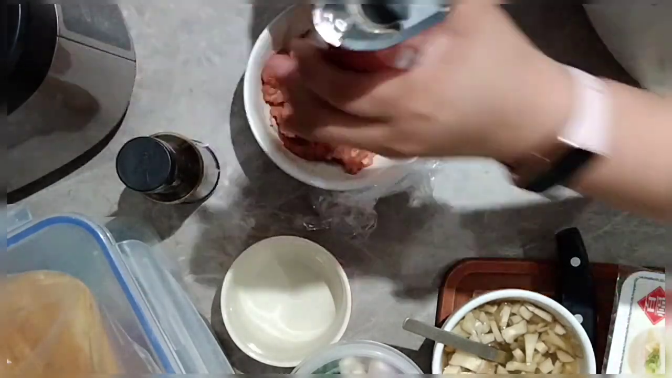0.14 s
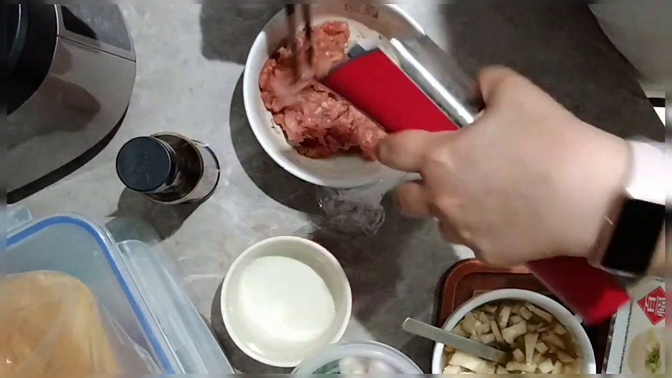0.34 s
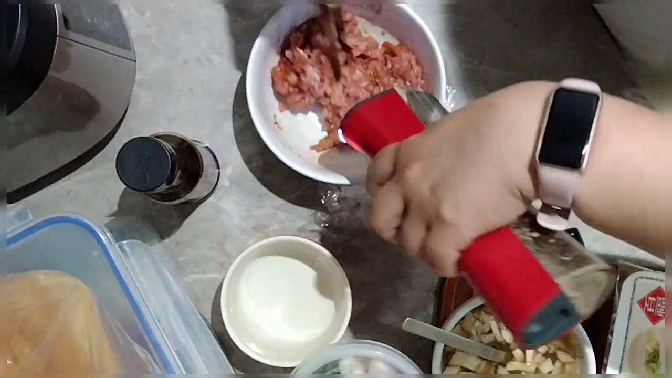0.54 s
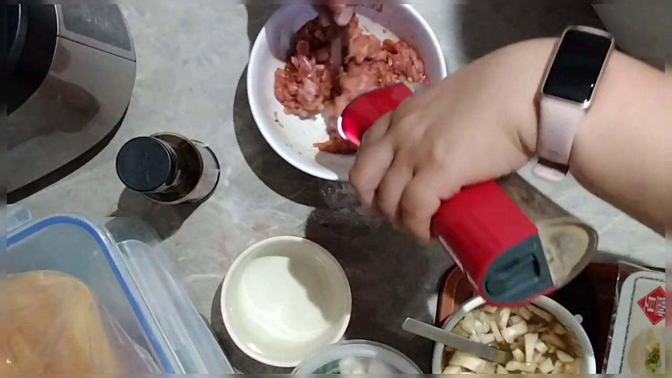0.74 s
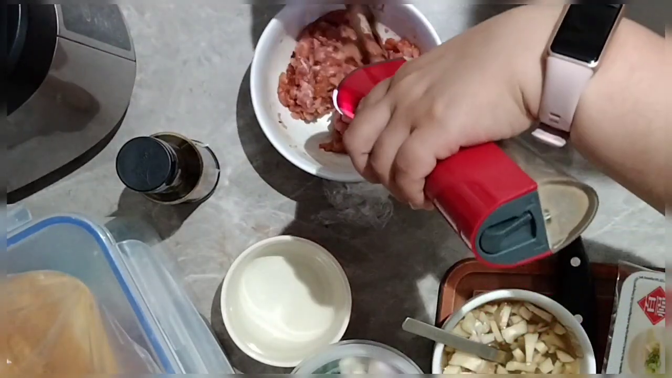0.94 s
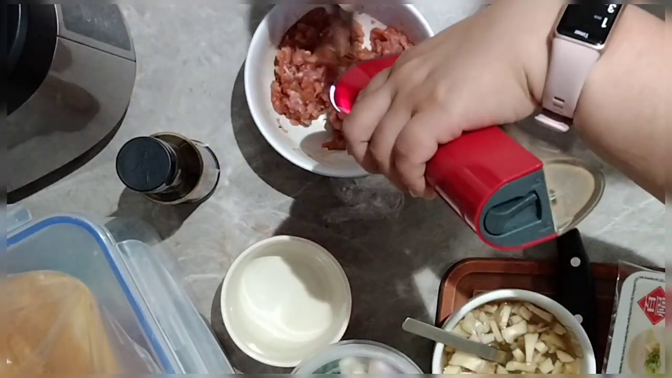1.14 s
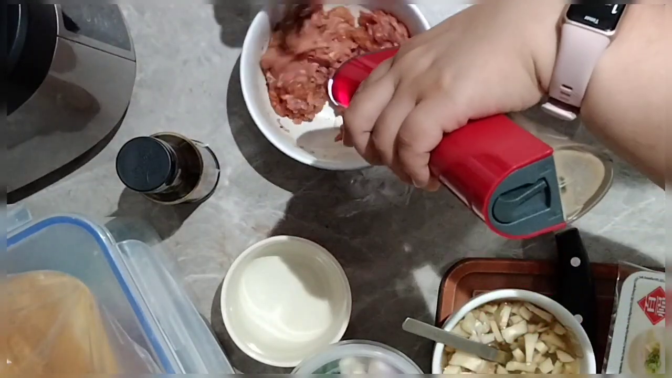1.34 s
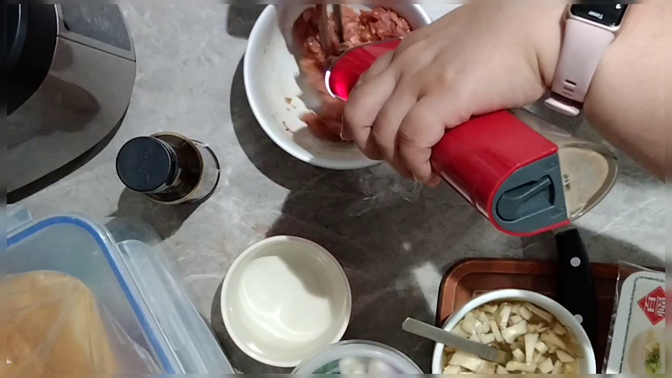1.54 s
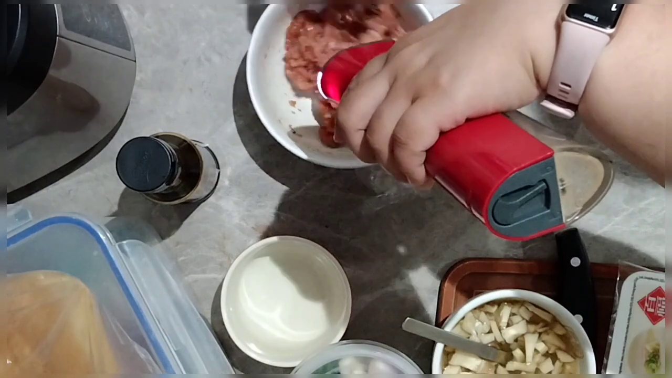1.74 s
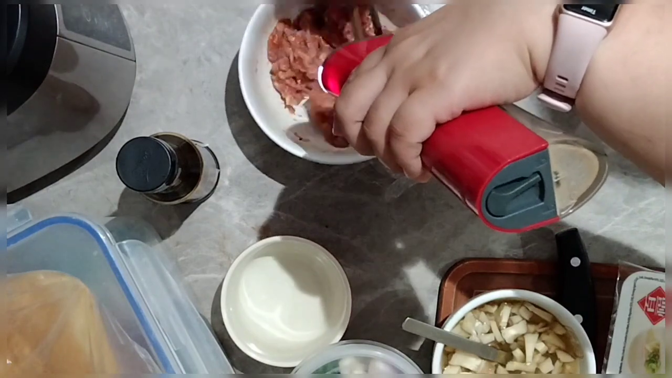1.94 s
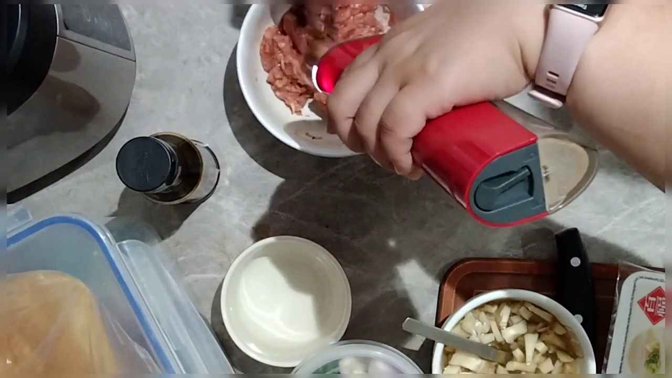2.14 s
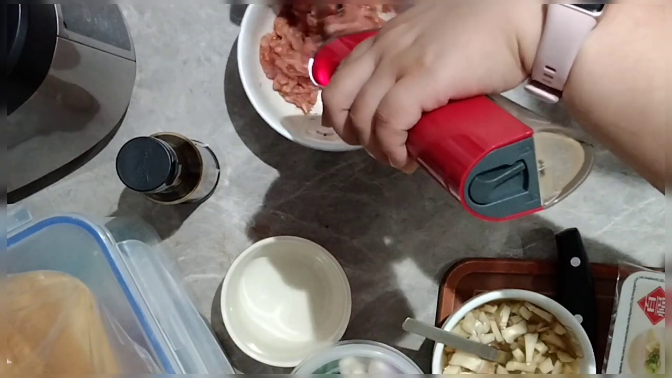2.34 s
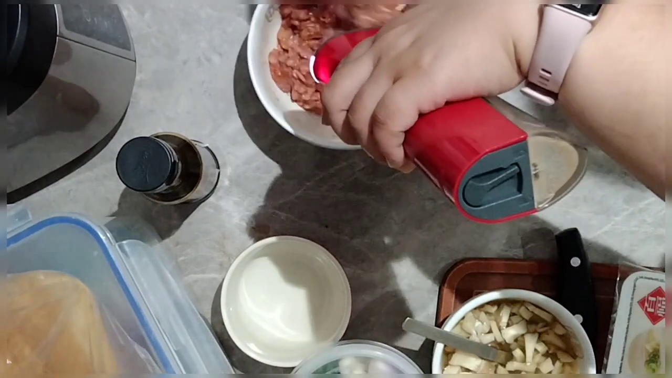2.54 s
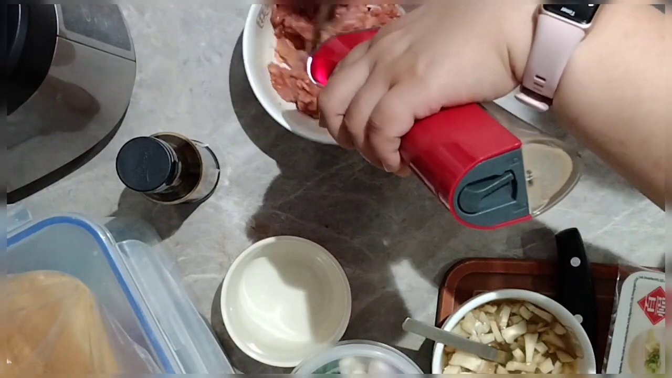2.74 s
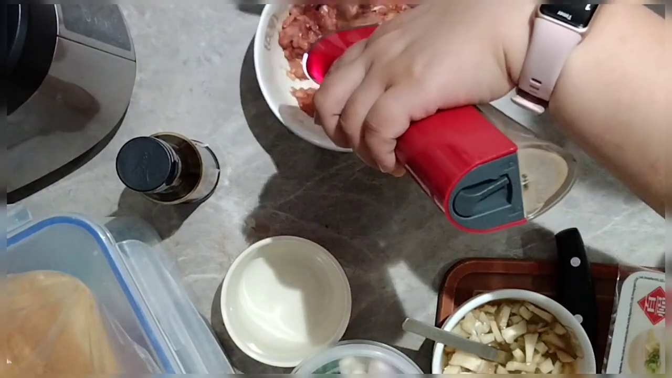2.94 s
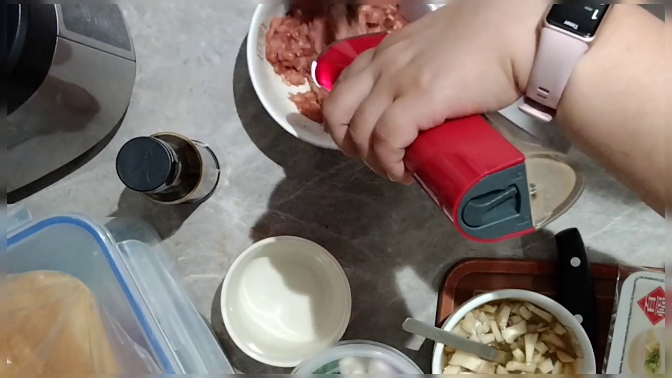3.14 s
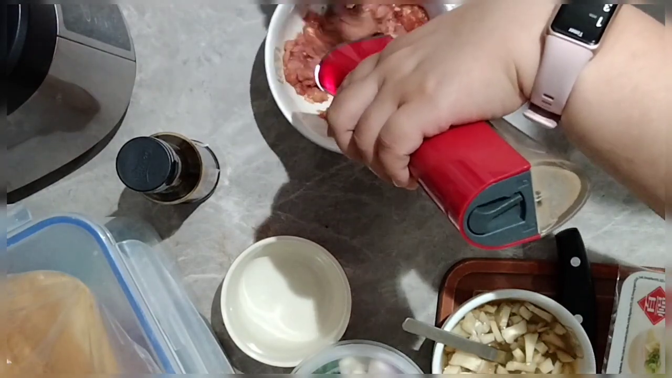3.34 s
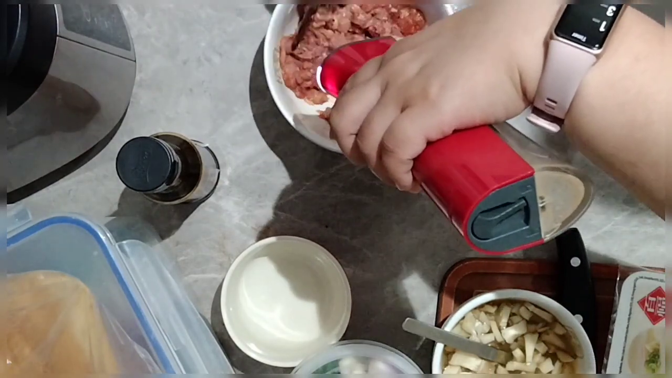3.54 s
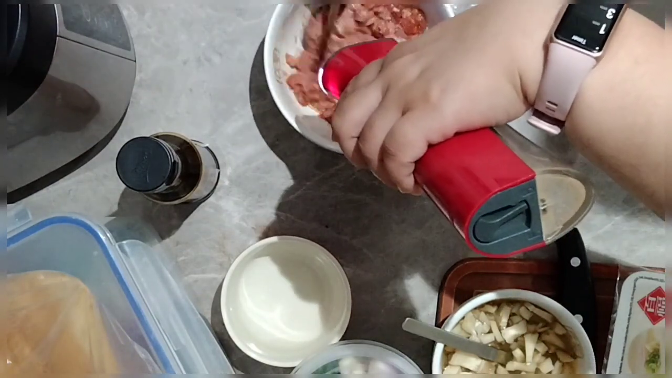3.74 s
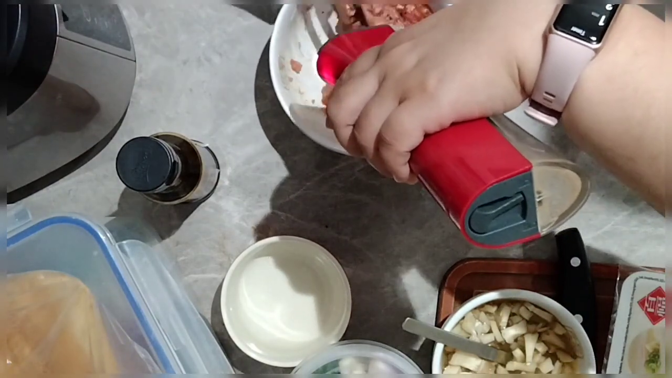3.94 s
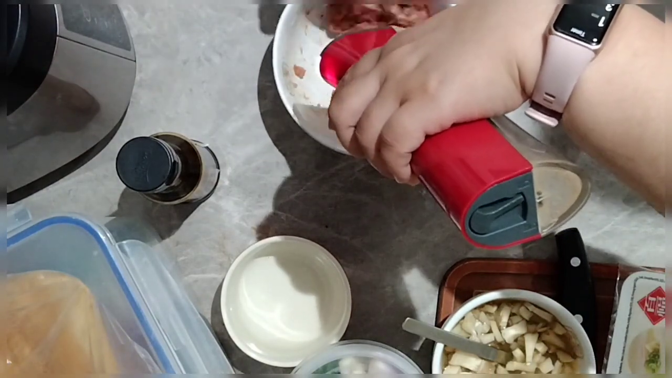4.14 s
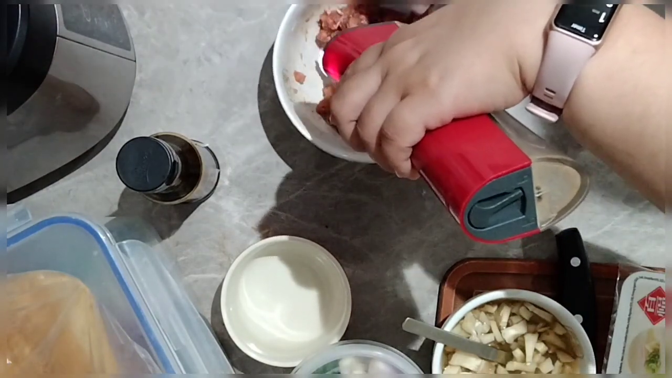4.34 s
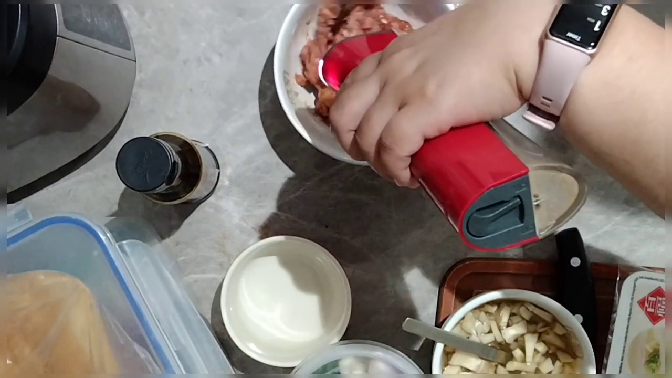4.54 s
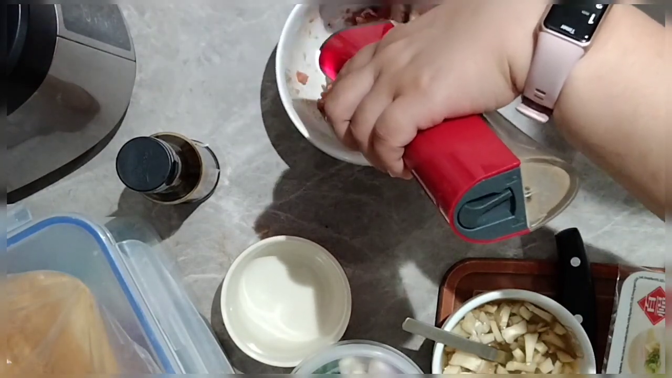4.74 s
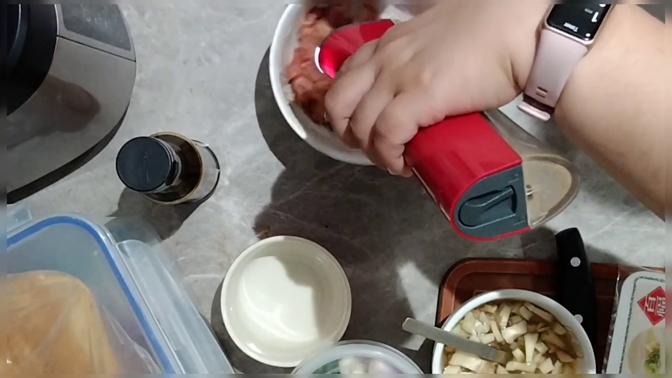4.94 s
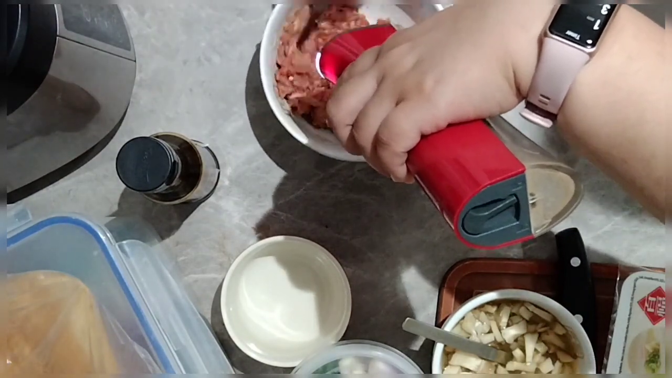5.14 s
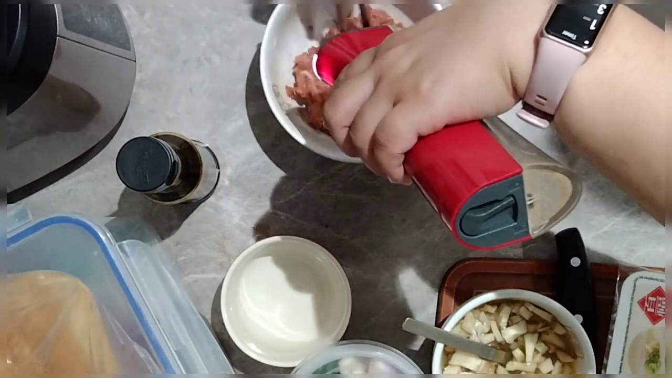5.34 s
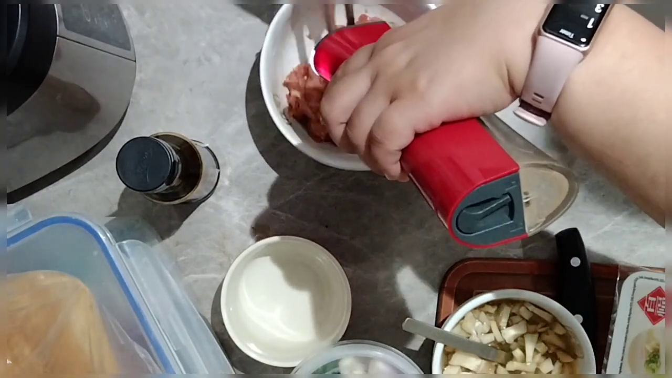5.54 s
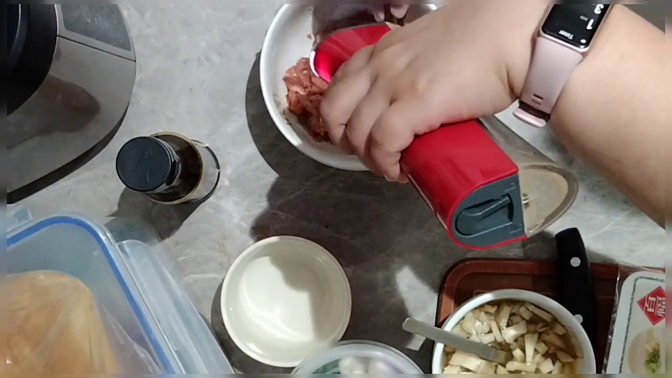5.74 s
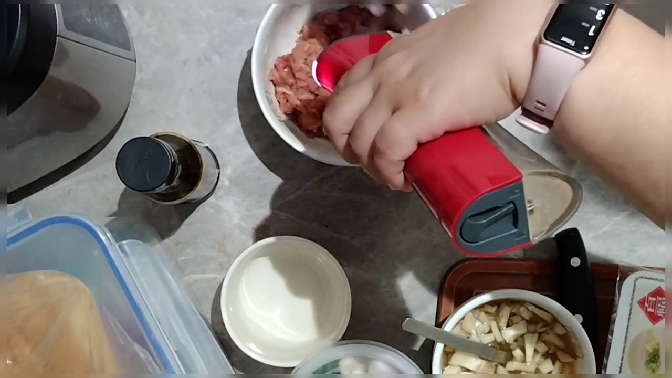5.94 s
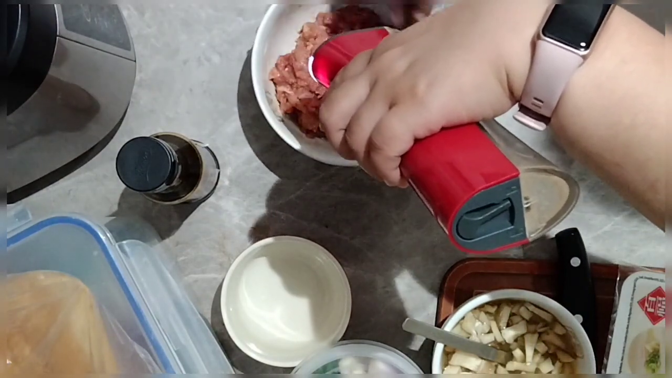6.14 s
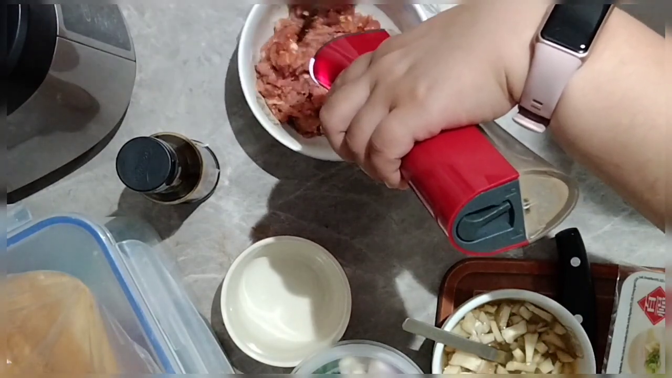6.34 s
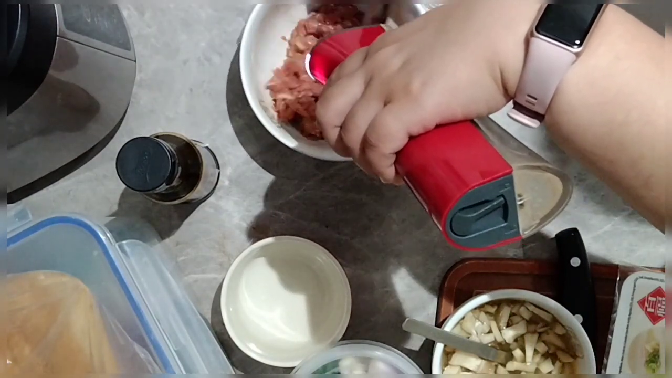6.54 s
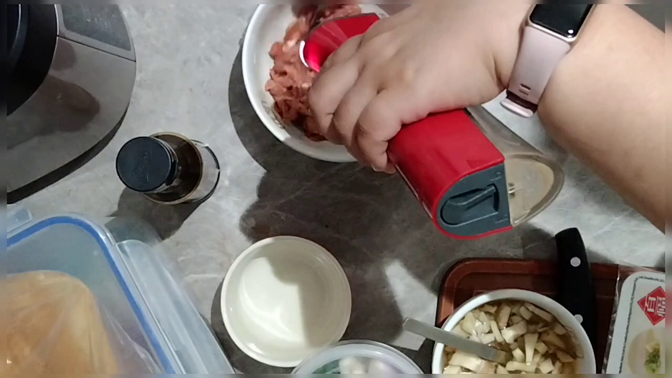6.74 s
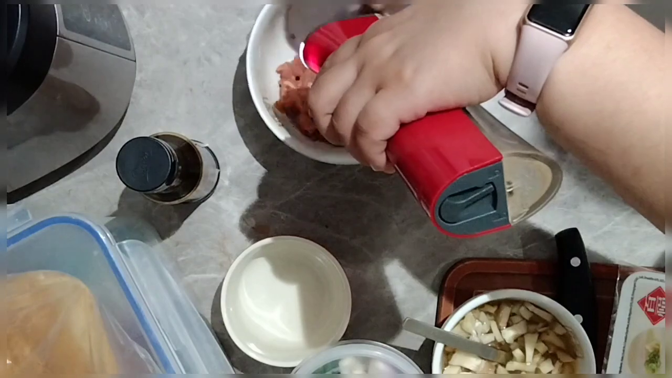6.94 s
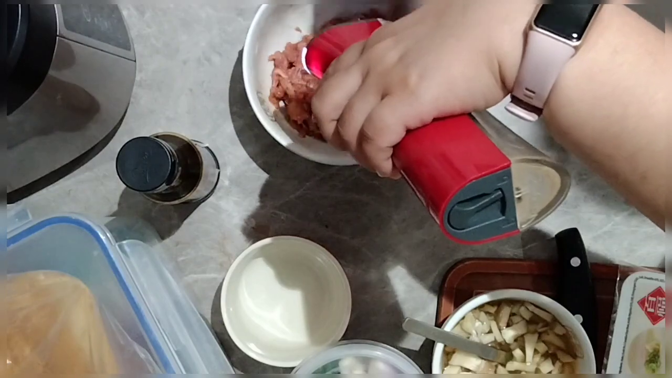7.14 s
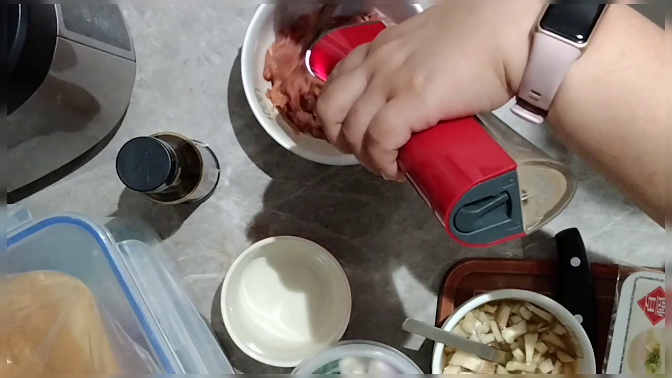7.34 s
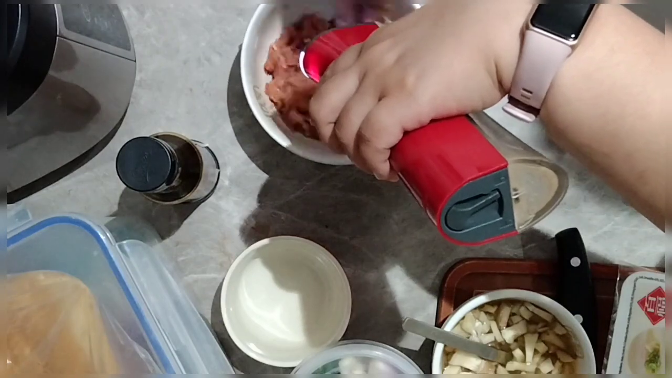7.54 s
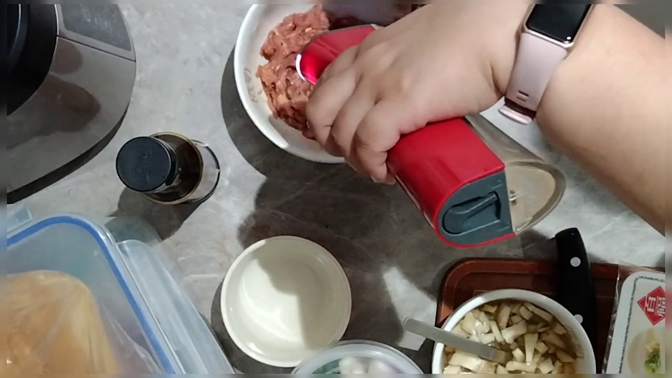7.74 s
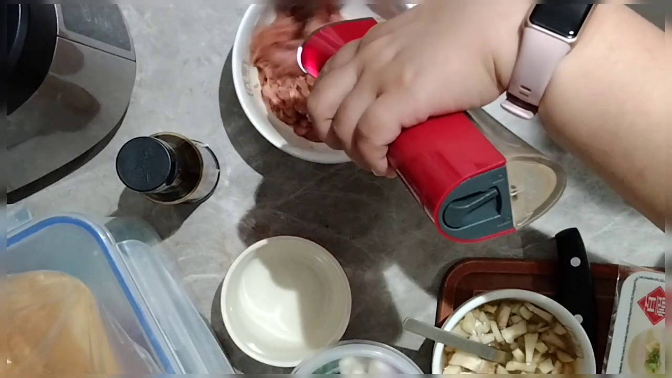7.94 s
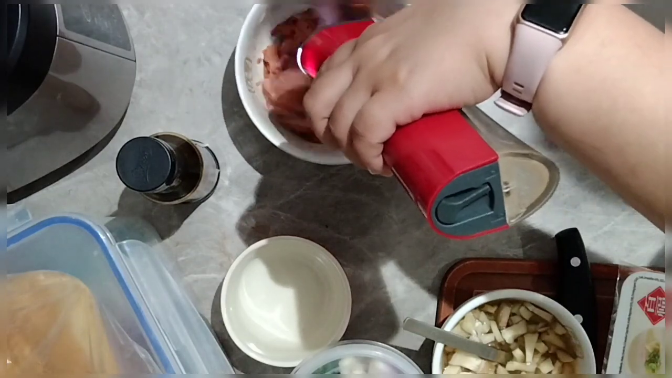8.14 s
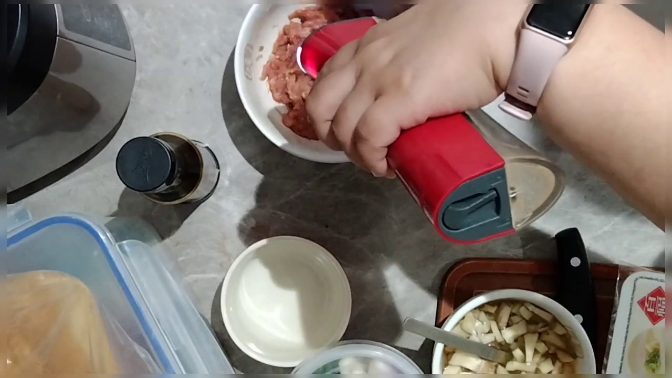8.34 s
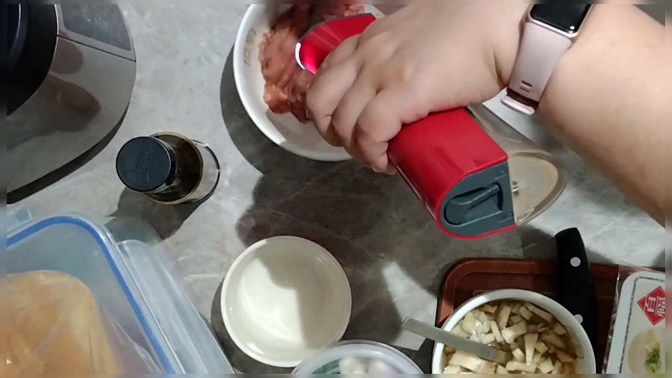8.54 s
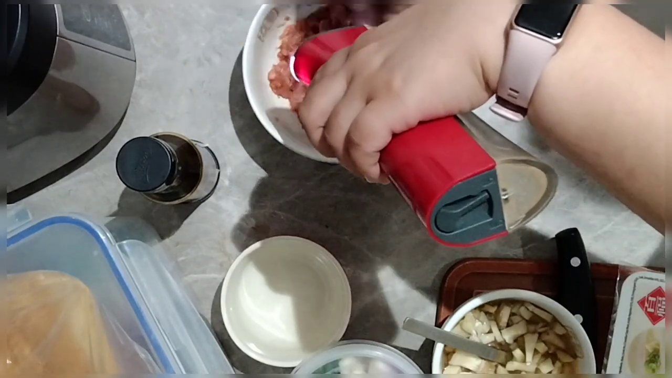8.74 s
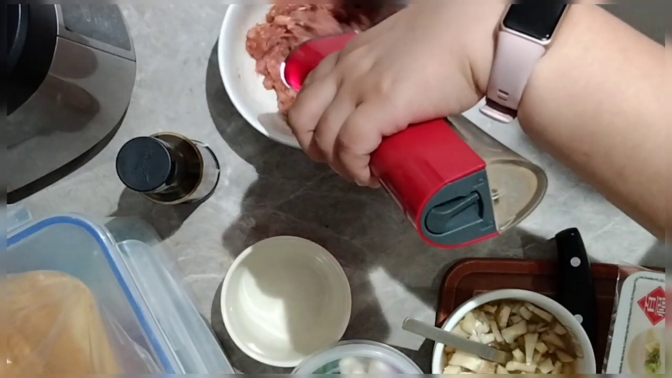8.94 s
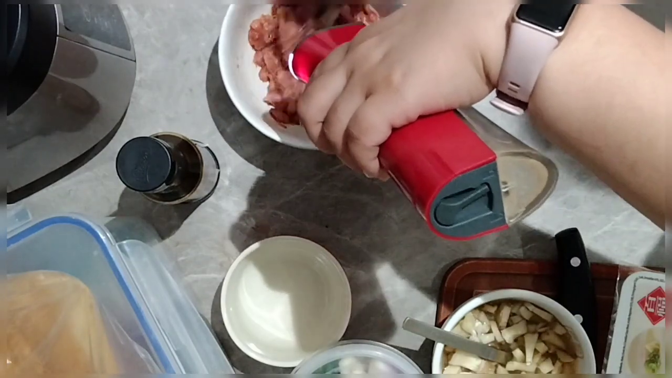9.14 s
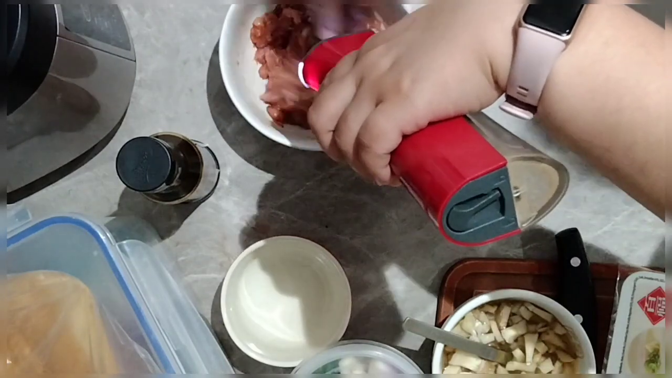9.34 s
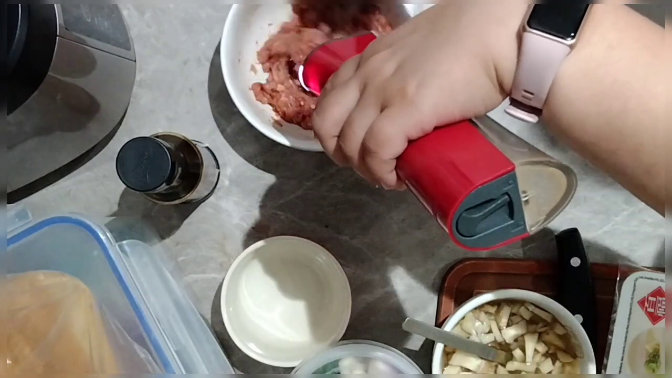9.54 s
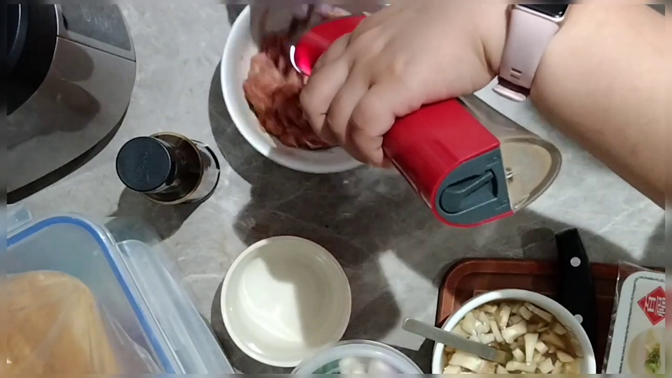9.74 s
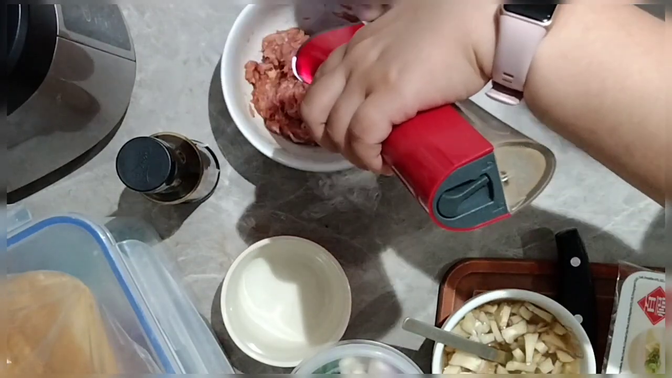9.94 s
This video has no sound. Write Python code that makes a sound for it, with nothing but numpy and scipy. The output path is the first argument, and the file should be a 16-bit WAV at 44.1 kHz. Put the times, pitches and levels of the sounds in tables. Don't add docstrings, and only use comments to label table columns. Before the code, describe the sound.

At the very start the ring of a clinked glass jar fades and is damped within about a quarter second, over barely audible fridge hum and faint air. Around 0.3 to 0.5 s dry peppercorns shift and slide in a tipping mill, a bright brief rattle with a papery rustle. At about 0.6 s a small battery motor spins up quickly and runs to the end, near 10 s: a nasal geared whine, gritty plastic-shell grinding and fine hiss. Its pitch sags and strains whenever a corn jams, clearly near 1.4, 2.1, 4.35 and 8.3 s, then springs back; cracking corns roughen it. Dull chopstick knocks in a bowl cluster at 2 to 2.6 s, come again around 3.3 s, 8.9 s and 9.7 s, with fainter taps between. Close mono phone sound, thin in the lows, in a small kitchen.

```python
import sys
import numpy as np
from scipy import signal
from scipy.fft import rfft, irfft, next_fast_len
from scipy.io import wavfile
from scipy.ndimage import uniform_filter1d, map_coordinates

SR = 44100
rng = np.random.default_rng(int(sys.argv[2]) if len(sys.argv) > 2 else 0)


def gain_from_decibels(decibels):
    exponent = np.asarray(decibels, float) / 20
    return 10 ** exponent


def wav_record(signal):
    frames = np.transpose(np.atleast_2d(signal))
    bounded = np.clip(frames, -1, 1)
    quanta = np.round(bounded * 32767).astype(np.int16)
    wavfile.write(sys.argv[1], SR, quanta)


N = 439677


def mill():
    # (multiple of the tooth rate [1], level [dB], blur [Hz])
    tooth_overtones = [(2, -2.5, 130), (3, .5, 150), (4, -1.5, 170)]
    # (frequency [Hz], width [Hz], level [dB])
    shell_modes = [(965, 110, 4), (1776, 20, 7), (1835, 50, 6), (1975, 90, 6), (2135, 27, 5), (2180, 30, 3),
                   (2270, 60, 3), (2396, 22, 9), (2470, 60, 7), (2649, 16, 10), (2736, 22, 6),
                   (2785, 20, 11), (2835, 35, 10), (2960, 40, 8), (3093, 27, 5), (3227, 43, 4)]
    # (frequency [Hz], spectrum level [dB per Hz])
    grind_colour = [(700, -51), (790, -20), (850, -8), (1000, -13.5), (1080, -9.5), (1400, -3.5),
                    (1700, -5.5), (2080, -6), (2350, -3.5), (2800, -3.5), (3300, -3), (3900, -11),
                    (4600, -20), (7000, -67)]
    # (frequency [Hz], spectrum level [dB per Hz])
    hiss_colour = [(2240, -30.5), (3800, -6), (4560, -9), (5910, -4), (6600, -7), (7600, -5), (8550, -12),
                   (11600, -16), (13500, -22), (14900, -20.5), (15500, -21)]
    teeth_per_turn = 15

    def shell(hz):
        return np.hypot(1, peaks(shell_modes, hz))

    def whine_path(hz):
        noise_filter_edge = np.hypot(1, (810 / (hz + 1)) ** 22)
        return shell(hz) ** 0.8 / np.hypot(1, (hz / 3500) ** 9) / noise_filter_edge

    tooth_hz, whine_db, strain_db, grind_db, hiss_db, on = motor()
    shaft_hz = tooth_hz / teeth_per_turn
    throb = np.cos(2 * np.pi * np.cumsum(shaft_hz) / SR)
    load = wobble(6)

    overtones = sum(gain_from_decibels(db) * blurred(k * tooth_hz, blur_hz, steady=0.4)
                    for k, db, blur_hz in tooth_overtones)
    fundamental = blurred(tooth_hz, blur_hz=40.2, steady=0.85)
    sideband = gain_from_decibels(-2.5) * blurred(tooth_hz + shaft_hz, blur_hz=30, steady=1.25)
    whine = fundamental + sideband + gain_from_decibels(strain_db) * (1 + 0.39 * throb) * overtones
    whine = filtered(gain_from_decibels(whine_db - 9.0) * whine, whine_path)

    grinding = unit(filtered(grit(grind_colour, patchy_db=0.84, crackle_db=2.0), shell))
    grind = gain_from_decibels(grind_db - 2.0 + 0.51 * load + 0.62 * throb) * grinding
    hiss_gain = gain_from_decibels(hiss_db + 0.48 * load + 0.12 * wobble(8))
    hiss = hiss_gain * grit(hiss_colour, patchy_db=0.82, crackle_db=0.5)
    return on * (whine + grind + hiss)


def motor():
    # (time [s], tooth rate between jams [Hz], grip coupling the gears to the shell [dB])
    running = [(.635, 900, -4), (.75, 935, -1), (1.12, 900, -0.5), (1.22, 800.3, -1), (1.76, 802.5, 2),
               (1.86, 916.6, -2), (2.22, 950, -1), (2.6, 889.6, -2), (2.95, 940.3, -4.5), (3.8, 925, -1),
               (4.15, 942.4, 3.5), (4.85, 954, 3), (5.45, 923, -2), (6.0, 973.7, -3.5), (6.75, 972, 4.5),
               (7.7, 962.4, 2.5), (8.55, 964.5, 0.5), (9.97, 971, 4.5)]
    # (time of lowest speed [s], sag [Hz], half length [s])
    jams = [(.93, 49.77, .08), (1.415, 90.54, 0.075), (1.99, 69.98, 0.071), (2.08, 175, .13),
            (2.47, 30, .07), (3.06, 60.05, .08), (3.33, 50.06, .1), (3.77, 55.36, .1), (3.95, 24.91, .07),
            (4.35, 120.1, .14), (5.12, 45.18, .13), (5.34, 34.75, 0.092), (5.82, 40, .11), (6.6, 44.9, .13),
            (7.07, 74.9, .11), (7.25, 35, .09), (7.48, 39.8, .1), (7.8, 34.97, .09), (8.3, 130.1, .17),
            (8.86, 70.14, .1), (9.19, 75.24, .1), (9.72, 45.06, .16)]
    # (time [s], level [dB])
    cracks = [(.66, 1.5), (1.0, 0), (1.24, 0), (1.39, 1), (1.49, -2.5), (1.62, 2.5), (1.965, 4), (2.16, -2),
              (2.38, 0), (3.17, -1), (3.42, 0.5), (3.58, 3), (4.07, 1.5), (4.25, 3), (4.56, 1), (5.31, 1),
              (5.43, -2.5), (5.56, 1), (5.79, 2.5), (6.0, -2), (6.95, 2.5), (7.24, -2.5), (7.8, 1.5),
              (8.15, 0.5), (8.51, -1.5), (9.15, 1), (9.62, 1.5)]
    switch_on_s = running[0][0]

    between_hz, grip_db, on = curves(running, rise=0.025)
    loaded_hz = between_hz - bumps(jams, after=0.4)
    slowed_hz = 950 - loaded_hz
    starting = bumps([(switch_on_s, 1, 0.09)])
    tooth_hz = loaded_hz * (1 - 0.3 * starting) + 9 * wobble(14)
    crack_db = bumps([(s, db, 0.031) for s, db in cracks])

    whine_db = -49 + grip_db - 0.0283 * slowed_hz + 1.95 * wobble(9)
    overtone_db = -42.5 + 0.71 * grip_db + 0.0508 * slowed_hz + 1.95 * wobble(9)
    strain_db = overtone_db - whine_db + 2 * starting + 0.53 * crack_db

    grind_db = -33.5 + 0.11 * grip_db + crack_db
    warmup_db = bumps([(switch_on_s, -3, 0.17)])
    hiss_db = -46 + 0.87 * crack_db - 0.13 * grip_db + warmup_db
    return tooth_hz, whine_db, strain_db, grind_db, hiss_db, on


def hopper():
    # (time [s], rattle peak level [dB], 60 dB decay time [s])
    slides = [
        (.27, -68, 0.47),
        (.36, -49, 0.44),
        (.385, -43, 0.25),
        (.402, -40, 0.21),
        (.51, -58, 1.4),
    ]
    # (frequency [Hz], spectrum level [dB per Hz])
    rattle_colour = [(1300, -60), (1650, -24), (2000, -33), (2400, -14), (2700, -4), (2900, 1), (3350, 2),
                     (3800, -12), (4400, -14), (6000, -38)]
    # (frequency [Hz], spectrum level [dB per Hz])
    rustle_colour = [(2470, -28), (4200, -12), (5030, 0), (5490, -3), (5990, -1.5), (7210, -1),
                     (9120, -8.5), (15500, -17)]
    slide = sum(decay(s, db, t60, rise_s=0.019) for s, db, t60 in slides)
    stir = decay(0.16, -67, t60=9, rise_s=0.03)
    rustle = gain_from_decibels(-43.5) * (slide / slide.max()) ** 0.92
    rattle = slide * grit(rattle_colour, patchy_db=1.1, crackle_db=2.8)
    return rattle + (rustle + stir) * grit(rustle_colour, patchy_db=2.0, crackle_db=1.0)


def jar():
    # (frequency [Hz], width [Hz], level [dB])
    jar_modes = [(560, 64, -8.5), (900, 40, -20), (1370, 85, -0.5), (1670, 40, -5), (1930, 35, -9),
                 (2710, 73, -6), (3480, 64, -0.5), (3820, 90, -15), (4790, 60, -26), (6070, 60, -12)]
    t = np.arange(N) / SR
    clink = gain_from_decibels(-41.5 - 60 * t / 0.099)
    ring = gain_from_decibels(-46 - 60 * t / 0.73)
    hand = 1 + (t / 0.21) ** 8
    fade = (clink + ring) / hand
    return filtered(fade * gain_from_decibels(16.5) * rng.standard_normal(N), lambda hz: peaks(jar_modes, hz) ** 1.5)


def knocks():
    # (time [s], peak level [dB], lowest frequency let through [Hz])
    knock_events = [(.998, -48.5, 230), (2.002, -41, 384), (2.263, -39, 484), (2.313, -37, 290),
                    (2.506, -35, 300), (2.6, -44.5, 329), (3.345, -39.5, 380), (8.03, -46.5, 400.4),
                    (8.85, -42, 190), (8.885, -41.5, 450), (8.932, -41, 378.7), (9.721, -39.5, 491),
                    (9.77, -46, 370)]
    # (time [s], peak level [dB], centre frequency [Hz])
    pitched_events = [(.41, -52, 2100), (0.47, -65, 1680), (.6, -50, 1150), (.78, -56, 660), (0.984, -50, 287),
                      (.99, -55, 467), (1.4, -56, 730), (1.62, -55, 730), (1.89, -51, 640), (2.47, -39, 1148),
                      (3.27, -60, 663.3), (3.33, -35, 1220), (4.29, -51, 750.5), (4.85, -64, 402),
                      (5.32, -57, 564.4), (5.63, -59, 415), (6.35, -59, 213), (6.4, -50, 474), (7.66, -66, 427),
                      (9.1, -44, 1247)]
    # (frequency [Hz], width [Hz], level [dB])
    bowl_modes = [(300, 50, -11.5), (420, 48, -10), (542, 32, -2), (680, 81, -3), (1220, 130, 2)]
    closing_hz = 520

    def above(hz, edge_hz):
        return 1 / np.hypot(1, (edge_hz / (hz + 1)) ** 8)

    def bowl(hz, low_hz):
        return peaks(bowl_modes, hz) * above(hz, low_hz)

    strikes = []  # (time [s], level [dB], 60 dB decay time [s], response)
    for s, db, low_hz in knock_events:
        strikes.append((s, db, 0.39, lambda hz, low=low_hz: bowl(hz, low) * above(hz, closing_hz)))
        strikes.append((s, db - 11, 0.29, lambda hz, low=low_hz: bowl(hz, low) * above(closing_hz, hz)))
    for s, db, tap_hz in pitched_events:
        strikes.append((s, db, 0.26, lambda hz, c=tap_hz: peaks([(c, 0.19 * c, 0)], hz) ** 3))

    out = np.zeros(N + SR)
    t = np.arange(SR // 2) / SR
    swell = np.clip(t / 0.022, 0, 1)
    for s, db, t60, response in strikes:
        thud = unit(filtered(rng.standard_normal(len(t)), response))
        out[round(s * SR):][:len(t)] += gain_from_decibels(db - 60 * t / t60) * swell * thud
    return out[:N]


def kitchen():
    # (frequency [Hz], spectrum level [dB per Hz])
    floor_colour = [(12, -69), (20, -47), (65, -9.5), (91, -10), (109, -7.5), (129, -14.5), (199, -15),
                    (370, -35), (412, -16.5), (466, -38), (552, -21.5), (718, -11.5), (800, -22.5),
                    (1040, -40), (1760, -120)]
    # (frequency [Hz], spectrum level [dB per Hz])
    air_colour = [(700, -120), (800, 1), (3500, -2), (4200, -17), (6500, -12), (8000, 0.5), (15600, -22)]
    hum = gain_from_decibels(-71) * blurred(np.full(N, 97), blur_hz=9, steady=3.5) / 3.5
    fan = gain_from_decibels(-80.5) * blurred(np.full(N, 76), blur_hz=12, steady=0.77)
    rumble = gain_from_decibels(-76.0) * grit(floor_colour, patchy_db=4.0, crackle_db=-3.5)
    air = gain_from_decibels(-70.5) * grit(air_colour, patchy_db=8.5, crackle_db=0.5)
    return hum + fan + rumble + air


def walls(x):
    # (frequency [Hz], 60 dB decay time [s])
    wall_t60 = [(300, 0.12), (2500, 0.58), (10000, 0.11)]
    hz, t, z = signal.stft(rng.standard_normal(SR // 2), SR, nperseg=256)
    fade = gain_from_decibels(-60 * t / along(wall_t60, hz)[:, None])
    tail = signal.istft(z * fade, SR, nperseg=256)[1]
    return signal.fftconvolve(x, tail / np.linalg.norm(tail))[:N]


def blurred(hz, blur_hz, steady):
    turn = 2 * np.pi * np.cumsum(hz) / SR
    return (steady + wobble(blur_hz)) * np.sin(turn) + wobble(blur_hz) * np.cos(turn)


def grit(spectrum, patchy_db, crackle_db):
    spiky = rng.standard_normal(N) * gain_from_decibels(crackle_db * wobble(900))
    z = signal.stft(spiky, nperseg=512)[2]
    field = uniform_filter1d(rng.standard_normal(z.shape), 5, 0)
    field = uniform_filter1d(field, 12, 1)
    x = signal.istft(z * gain_from_decibels(patchy_db * unit(field)), nperseg=512)[1][:N]
    return unit(filtered(x, lambda hz: gain_from_decibels(along(spectrum, hz))))


def peaks(modes, hz):
    return np.sqrt(sum(gain_from_decibels(2 * db) / (1 + (2 * (hz - c) / w) ** 2) for c, w, db in modes))


def filtered(x, response):
    m = next_fast_len(len(x) + 8192)
    return irfft(rfft(x, m) * response(np.fft.rfftfreq(m, 1 / SR)), m)[:len(x)]


def decay(s, db, t60, rise_s):
    t = np.arange(N) / SR - s
    return np.clip(t / rise_s, 0, 1) * gain_from_decibels(db - 60 * np.maximum(t - rise_s, 0) / t60)


def bumps(rows, after=1):
    t = np.arange(N) / SR
    out = np.zeros(N)
    for s, height, half_s in rows:
        width = np.where(t > s, after * half_s, half_s)
        out += height * np.exp(-((t - s) / width) ** 2)
    return out


def curves(rows, rise):
    s, *cols = np.transpose(rows)
    t = np.arange(N) / SR
    on = np.clip(np.minimum(t - s[0] + rise, s[-1] + 0.05 - t) / rise, 0, 1)
    return [np.interp(t, s, c) for c in cols] + [on]


def wobble(rate):
    knots = rng.standard_normal(int(N * rate / SR) + 4)
    return map_coordinates(knots, [np.arange(N) * rate / SR])


def along(points, hz):
    f, v = np.transpose(points)
    return np.interp(np.log(hz + 1), np.log(f + 1), v)


def unit(x):
    return x / np.sqrt(np.mean(x ** 2) + 1e-20)


def scene():
    near = mill() + hopper()
    mono = near + gain_from_decibels(-8.5) * walls(near) + jar() + knocks() + kitchen()
    return np.array([mono, mono])


def band_limit(x):
    return signal.sosfilt(signal.butter(12, 15640, fs=SR, output="sos"), x)


def record(dry):
    mono = filtered(dry[0], lambda hz: hz < 15560)
    return band_limit(np.array([mono, mono]))


dry = scene()
out = record(dry)
wav_record(out)
```